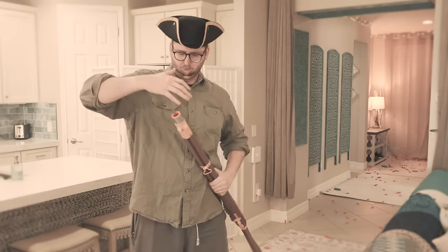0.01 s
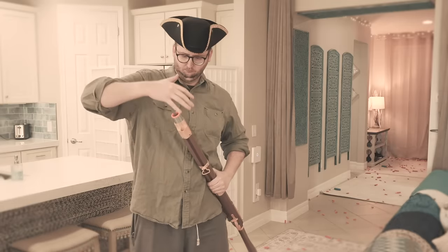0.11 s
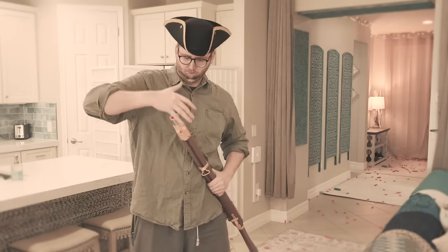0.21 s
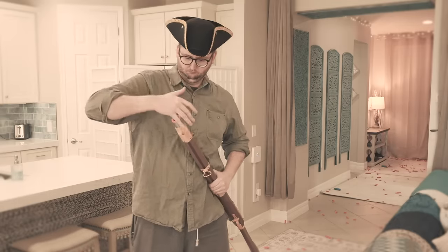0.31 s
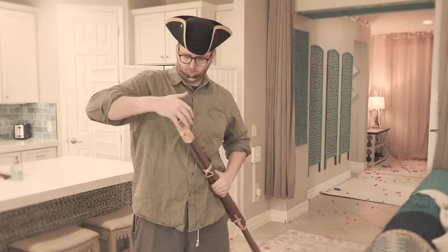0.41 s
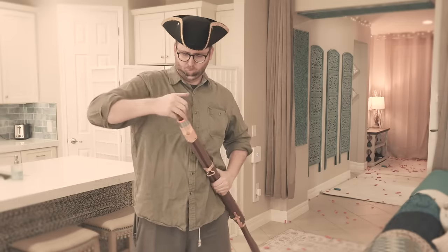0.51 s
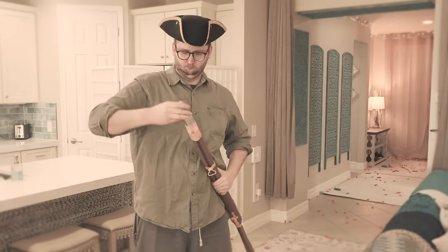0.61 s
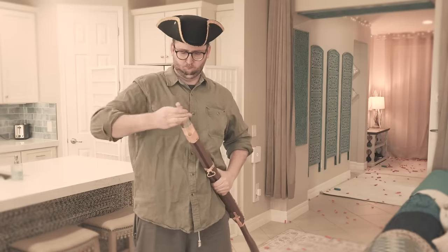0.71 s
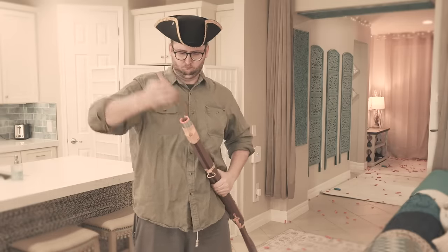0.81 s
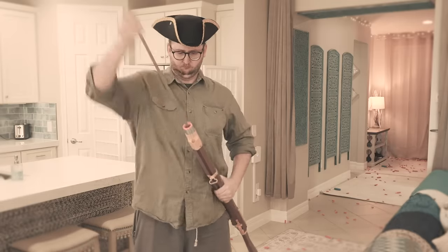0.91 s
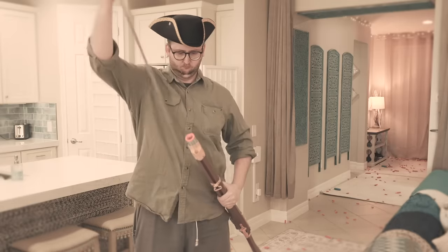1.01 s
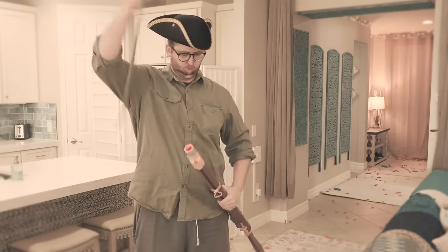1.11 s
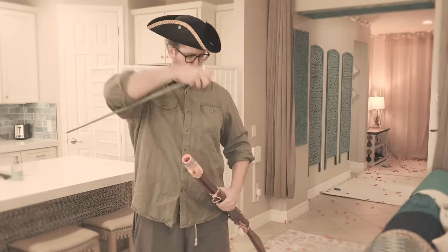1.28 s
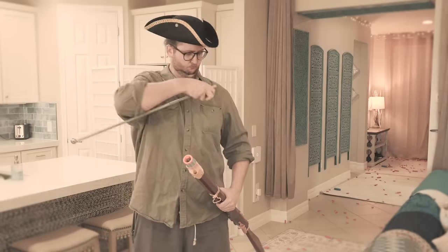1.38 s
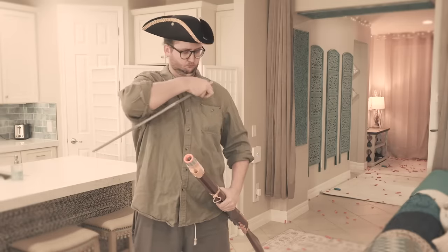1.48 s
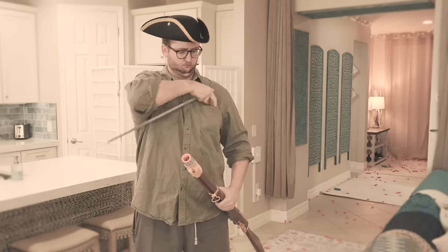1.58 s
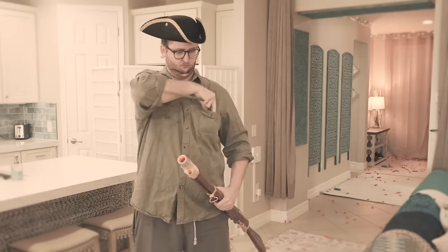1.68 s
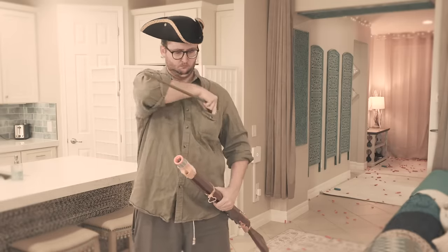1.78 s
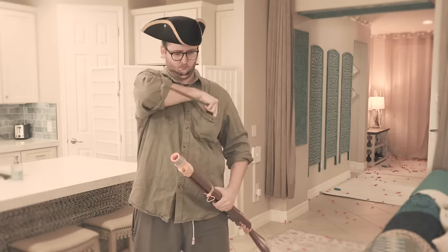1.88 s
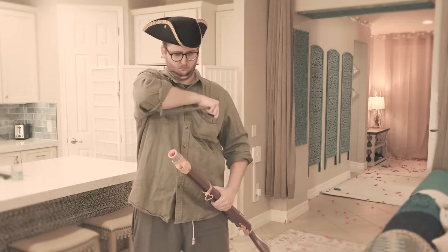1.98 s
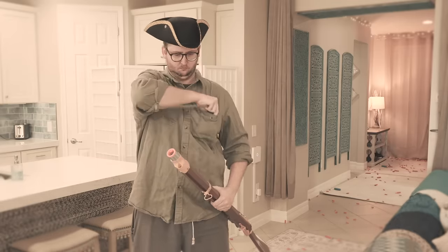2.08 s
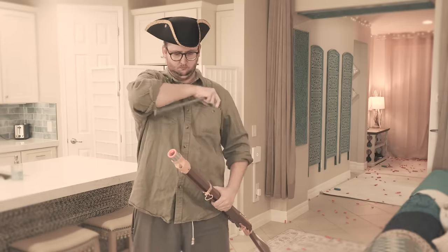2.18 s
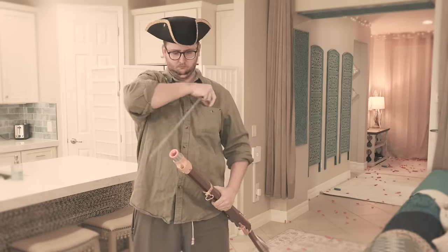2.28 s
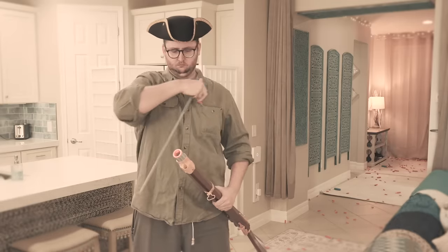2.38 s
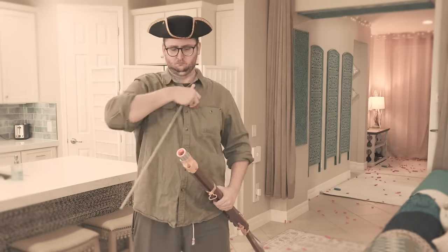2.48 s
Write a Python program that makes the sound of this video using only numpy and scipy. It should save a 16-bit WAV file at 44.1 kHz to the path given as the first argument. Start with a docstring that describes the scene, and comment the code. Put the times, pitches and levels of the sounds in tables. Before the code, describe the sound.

A thin rod scrapes out of a hollow plastic toy musket barrel. Light scuffing begins around 0.1 s, a rough scrape at 0.24 and the loudest sharp clack at 0.32. Softer hollow knocks and scuffs follow from 0.48 to 0.75, then scraping at 0.86 and a bright, briefly ringing triple click at 0.98. Afterwards, faint sleeve swishes around 1.7-2.2 s over quiet appliance hum and hiss, with short room reverberation.

```python
"""In a kitchen, a thin rod is drawn out of a hollow plastic barrel, then a sleeve rustles.
The rod drags and scuffs as streams of random impulses and knocks as single ones; these forces excite
the resonances of air column, shell and rim, and the last blows at the muzzle also ring the freed rod.
The sleeve is coloured noise swelling in swishes, with tiny ticks. Barrel and sleeve sound in a small
room, over wavering appliance hum (sines), a faint far drone (narrow-band noise) and room hiss."""
import sys
import numpy as np
from scipy import signal
from scipy.fft import rfft, irfft, next_fast_len
from scipy.io import wavfile
from scipy.ndimage import map_coordinates

SR = 44100
rng = np.random.default_rng(int(sys.argv[2]) if len(sys.argv) > 2 else 0)


def inscribe(sig):
    """Save sig as 16-bit PCM at rate SR to the path in sys.argv[1].

    A 1-D sig is mono; a 2-D sig holds one channel per row.
    Samples are clipped to [-1, 1] before scaling.
    """
    pcm = np.round(np.clip(np.atleast_2d(sig).T, -1, 1) * 32767)
    wavfile.write(sys.argv[1], SR, pcm.astype(np.int16))


def field_ratio(decibels):
    """Amplitude ratio for a level in dB (20 dB per decade); scalars and array-likes work."""
    return 10 ** (np.asarray(decibels, dtype=float) / 20)


N = 110250  # samples, 2.5 s


def unit(x):
    """Normalisation: scales a signal to rms 1."""
    return x / np.sqrt(np.mean(x ** 2) + 1e-20)


def along(points, hz):
    """Logarithmic frequency axis: interpolates (f/Hz, value) points on it."""
    f, value = np.transpose(points)
    return np.interp(np.log(hz + 1), np.log(f + 1), value)


def curves(rows):
    """Piecewise-linear envelopes: one value per sample for each column after t/s."""
    s, *columns = np.transpose(rows)
    t = np.arange(N) / SR
    return [np.interp(t, s, column) for column in columns]


def wobble(rate):
    """Slow random modulation: a smooth curve through random knots, rate of them a second."""
    return map_coordinates(rng.standard_normal(N // 64), [np.arange(N) * rate / SR])


def filtered(x, response):
    """Linear filtering: multiplies the spectrum of x by a response of frequency."""
    size = next_fast_len(N + SR // 2)
    hz = np.fft.rfftfreq(size, 1 / SR)
    return irfft(rfft(x, size) * response(hz), size)[..., :N]


def resonances(modes, sum_up=True):
    """Modal superposition: second-order peaks of alternating sign, summed or one row each."""
    centre, width, db = np.transpose(modes)[..., None]
    sign = (-1.) ** np.arange(len(modes))[:, None]
    corner = 1.6 * centre[-1]  # Hz; the whole set fades steeply above it

    def peaks(f):
        damping = 1j * f * width
        peak = damping / (centre * centre - f * f + damping)
        return sign * field_ratio(db) * peak / (1 + 1j * f / corner) ** 2

    def summed(f):
        return peaks(f).sum(0)

    return summed if sum_up else peaks


def grains(per_s, spread_db):
    """Shot noise: random impulses of uneven size, rms 1."""
    chance = rng.random(N)
    size = np.minimum(rng.exponential(size=N), 3)
    weight = rng.standard_normal(N)
    return unit((chance < per_s / SR) * field_ratio(spread_db * size) * weight)


def noise(spectrum):
    """Spectral shaping: white noise given a colour, rms 1."""
    white = rng.standard_normal(N)
    return unit(filtered(white, lambda hz: field_ratio(along(spectrum, hz))))


# Appliance hum lines: f/Hz, wander rate/(knots/s), level offset/dB
HUM_LINES = [(58.8, 1.6, -1), (85.6, 6.5, -7), (120, 9.5, -3)]
# Lowest hum line, before its offset; its mean sets the other lines: t/s, level/dB
HUM_LEVEL = [(0.0, -65), (0.29, -66.5), (0.7, -78), (1.04, -69), (1.62, -65), (2.08, -76.5), (2.5, -74)]
# Faint far drone: t/s, level/dB
DRONE_LEVEL = [(2.14, -110), (2.2, -78), (2.31, -79), (2.35, -90), (2.42, -79), (2.5, -78)]
# Resonance of the drone: f/Hz, width/Hz, relative level/dB
DRONE_BAND = [(350, 35, 0)]
# Colour of the room hiss: f/Hz, relative spectral level/dB
HISS_SPECTRUM = [(20, -4.5), (117, -5), (141, -8.5), (175, -13.5), (496, -18), (599, -15.5), (826, -22),
                 (3500, -31.5), (12000, -42), (15600, -74), (22000, -120)]
HISS_DB = -72.5  # rms, before a slow wobble


def background():
    """Stationary sources: phase-wandering hum lines, narrow-band drone noise and broadband hiss."""
    t = np.arange(N) / SR
    low_db, = curves(HUM_LEVEL)
    middle_db = low_db.mean() + 2.5 * wobble(HUM_LINES[1][1])
    high_db = low_db.mean() + 1.5 * wobble(HUM_LINES[2][1])
    hum = np.zeros(N)
    for (hz, rate, offset_db), level_db in zip(HUM_LINES, [low_db, middle_db, high_db]):
        phase = 2 * np.pi * hz * t + 0.7 * wobble(rate)
        hum += field_ratio(level_db + offset_db) * np.sqrt(2) * np.sin(phase)  # level is rms
    band = resonances(DRONE_BAND)
    drone = unit(filtered(rng.standard_normal(N), lambda hz: band(hz) ** 2))
    drone = field_ratio(curves(DRONE_LEVEL)[0]) * drone
    hiss = field_ratio(HISS_DB + 0.67 * wobble(2.4)) * noise(HISS_SPECTRUM)
    return hum + drone + hiss


# Rod dragging on the wall: t/s, shell level/dB, air column over shell/dB, rim over shell/dB
DRAG = [(0, -75, 11, -24), (.1, -84, 13.5, -22), (.17, -62, 4, -18.5), (.19, -53.5, 6, -20.5),
        (.235, -50, 8, -19.5), (.26, -44, -1.5, -17.5), (.31, -45.5, -0.5, -15), (.36, -57, 0, -13),
        (.45, -72, 7, -17), (.54, -72, 7.5, -38), (.635, -70.5, 12, -31), (.67, -70.5, 8, -39),
        (.77, -77.5, 9, -27), (.81, -65, 4.5, -18), (.85, -54.5, 1.5, -11), (.875, -62, 2.5, -18.5),
        (.92, -62.5, 6.5, -13.5), (.962, -54.5, 2.5, -21.5)]
# Short rough bursts: t/s, shell level/dB, air column over shell/dB, rim over shell/dB, decay time/ms
SCUFFS = [(0.0831, -56, 2.5, -24.5, 2.8), (0.1294, -51.5, -7, -29, 8.9), (0.2382, -28, -10, -11, 9.4),
          (0.332, -30.5, -10.5, -16, 5.7), (0.4844, -50.5, 5, -25, 8.4), (0.499, -51.5, 4.5, -19, 2.9),
          (0.5514, -57, -1.5, -6, 3.2), (0.572, -42.5, 0.5, -10.5, 6), (0.589, -41.5, 7.5, -17, 5.9),
          (0.606, -51.5, 9, -27, 3.2), (0.616, -51, 11, -22, 4.7), (0.6817, -51.5, 7, -17, 5.9),
          (0.712, -53.5, -0.5, -21, 8.6), (0.723, -48, 7, -28, 6.1), (0.747, -56, 5.5, -17, 2.9),
          (0.8602, -45.5, -1, -13, 1.4), (0.878, -42, -7, -13, 5.4), (0.89, -38, -3.5, -6, 7.3),
          (0.9635, -35, -0.5, -12, 6.6), (0.981, -26, -6, -1, 8.8), (1, -30, -9.5, -11, 4.8)]
DRAG_END_S = 1
DRAG_GRAINS_PER_S, DRAG_SPREAD_DB, CHATTER_PER_S = 4000, 2.5, 3700
SCUFF_RISE_S = 0.0018


def friction():
    """Rough contact as shot noise: steady drag and scuff bursts; force rows for air, shell, rim."""
    t = np.arange(N) / SR
    bursts = np.zeros((3, N))
    for s, scuff_db, tube_db, rim_db, decay_ms in SCUFFS:
        age = np.clip(t - s, 0, None)
        size = field_ratio(scuff_db + np.array([[tube_db], [0], [rim_db]]))
        bursts += size * (1 - np.exp(-age / SCUFF_RISE_S)) * np.exp(-age * 1000 / decay_ms)
    db, tube_db, rim_db = curves(DRAG)
    balance_db = np.array([tube_db, 0 * db, rim_db])
    press = field_ratio(db + balance_db + 2.2 * wobble(70)) * (t < DRAG_END_S)
    force = []
    for burst, pressure in zip(bursts, press):
        chatter = burst * grains(CHATTER_PER_S, spread_db=0.0)
        drag = pressure * field_ratio(1.9 * wobble(50)) * grains(DRAG_GRAINS_PER_S, DRAG_SPREAD_DB)
        force.append(chatter + drag)
    return np.array(force)


# Rod snapping against the wall: t/s of first touch, shell level/dB, air column over shell/dB, # rim over
# shell/dB; the row at 0.3188 s is a strong echo of the loud blow just before it from a near wall
SNAPS = [(0.1717, -39.5, -8.5, 1), (0.315, -10.5, -19, -6.5), (0.3188, -17, -17.5, -19.5),
         (0.5696, -35.5, -2.5, -8.5), (0.5884, -40, 0, -3.5), (0.7984, -58, -14, 2.5),
         (.8790, -36, -15, -7), (0.9766, -20.5, -17, 2.5), (0.9789, -22, -16, 11),
         (0.9812, -19.5, -9.5, -4)]
LEAD_S, LEAD_DB = .0012, -13.5  # a faint first touch before each blow


def snaps():
    """Impact as an impulse: single blows; one force row each for air column, shell and rim."""
    force = np.zeros((3, N))
    for s, db, tube_db, rim_db in SNAPS:
        size = field_ratio(db + np.array([tube_db, 0, rim_db]))
        force[:, round(s * SR)] += field_ratio(LEAD_DB) * size
        force[:, round((s + LEAD_S) * SR)] += size
    return force


# The barrel's resonances, as air column, plastic shell and hard rim: f/Hz, width/Hz, level/dB
AIR_COLUMN = [(221, 150, -16.5), (334, 390, -12), (566.2, 190, -8.5), (830, 240, -6.5), (1064, 260, 0.5),
              (1660, 880, -4.5)]
SHELL = [(2080, 260, -2), (2538, 470, 1.5), (3220, 840, 1.5), (3744, 540, 2), (5020, 490, 2),
         (5860, 100, -6.5)]
RIM = [(6350, 2100, -2), (8980, 730, 4.5), (9900, 3100, -1), (12000, 470, -7), (12500, 2800, -11.5)]
# Force on the two lowest air resonances: t/s, level/dB
LOW_BODY = [(.17, 7.5), (.3, 0.5), (.7, 0.5), (.9, 3.5), (.97, -4)]
# Ring of the freed rod: f/Hz, width/Hz, level/dB
ROD = [(400, 70, 17), (2927, 90, 21), (3390, 65, 22.5), (5746, 92, 29)]
SWAY_DB, SWAY_PER_S = 2.5, 25  # the moving contact point favours now one resonance, now another
FREE_S = 0.97  # the rod reaches the muzzle


def barrel():
    """Forced modal vibration: blows and friction ring the barrel; at the muzzle the rod rings too."""
    out = np.zeros(N)
    impulse = np.arange(N) == 0
    blows = snaps()
    for modes, blow, rub in zip((AIR_COLUMN, SHELL, RIM), blows, friction()):
        ring = filtered(impulse, resonances(modes))
        sway_db = SWAY_DB * np.array([wobble(SWAY_PER_S) for _ in modes])
        # blows are scaled by the ring's peak, friction by its energy
        force = blow / np.abs(ring).max() + rub * field_ratio(sway_db) / np.linalg.norm(ring)
        if modes is AIR_COLUMN:
            force[:2] *= field_ratio(curves(LOW_BODY)[0])
        out += filtered(force, resonances(modes, sum_up=False)).sum(0)
    muzzle_blows = blows[1] * (np.arange(N) > FREE_S * SR)
    return out + filtered(muzzle_blows, resonances(ROD))


# Colour of the cloth: f/Hz, relative spectral level/dB
CLOTH_SPECTRUM = [(410, -36.5), (700, -7.5), (1360, -2.5), (1900, -10.5), (3400, -4.5), (4300, -9.5),
                  (5360, -4), (6680, -15.5), (13600, -15.5), (15500, -24.5)]
# Tiny ticks: t/s, level/dB before colouring
CLOTH_TICKS = [(1.467, -66), (1.569, -67.5), (1.652, -65), (1.666, -65.5), (2.012, -73), (2.167, -63)]
# Swishes, Gaussian in time: t/s of the middle, level/dB, half length/s (standard deviation)
SWISHES = [(1.483, -91, 0.031), (1.761, -76.5, 0.026), (1.862, -78, 0.023), (1.995, -77, 0.034),
           (2.161, -79.5, 0.014), (2.217, -87, 0.029)]
RUSTLE_DB = -89.5  # the cloth never rests quite


def sleeve():
    """Friction noise: cloth swishes on cloth as the arm turns, with a few tiny ticks."""
    t = np.arange(N) / SR
    swell = np.full(N, field_ratio(RUSTLE_DB))
    for s, db, half in SWISHES:
        swell += field_ratio(db) * np.exp(-((t - s) / half) ** 2 / 2)
    rub = unit(rng.standard_normal(N) + 0.7 * grains(1500, spread_db=3))
    force = rub * swell * field_ratio(1.55 * wobble(29.96))
    decay = np.exp(-np.arange(60) / 20)  # in samples
    for s, tick_db in CLOTH_TICKS:
        force[round(s * SR):][:60] += field_ratio(tick_db) * rng.standard_normal(60) * decay

    def colour(hz):
        return field_ratio(along(CLOTH_SPECTRUM, hz))

    return filtered(force, colour) / np.linalg.norm(filtered(np.arange(N) == 0, colour))


# Reverberation of the room: f/Hz, decay time by 60 dB/s
ROOM_DECAY = [(200, 0.91), (530, 0.37), (3700, 0.35), (9700, .25)]
# First reflections from near walls: delay/s, level/dB
WALLS = [(.0095, -23), (.019, -18)]
ROOM_DB, ROOM_RISE_S = -8, 0.0062  # energy and build-up time of the tail
MOVES_PER_S = 12  # the room answers differently as the source shifts


def room(x):
    """Reverberation by convolution: wall echoes and a decaying noise tail, new for each position."""
    hop = SR // MOVES_PER_S
    out = np.zeros(N + 2 * SR)
    starts = np.arange(-hop, N, hop)
    white = rng.standard_normal((len(starts), SR // 2))
    hz, t, spectrum = signal.stft(white, SR, nperseg=256)
    decay = field_ratio(-60 * t / along(ROOM_DECAY, hz)[:, None])
    tails = signal.istft(spectrum * decay, SR, nperseg=256)[1]
    age = np.arange(tails.shape[1]) / SR
    tails = tails * (1 - np.exp(-(age / ROOM_RISE_S) ** 2))
    tails = field_ratio(ROOM_DB) * tails / np.linalg.norm(tails, axis=1, keepdims=True)
    for s, db in WALLS:
        tails[:, round(s * SR)] += field_ratio(db)
    padded = np.pad(x, (hop, 2 * hop))
    fade = np.sin(np.pi * np.arange(2 * hop) / (2 * hop))  # overlapping fades keep the power constant
    for start, tail in zip(starts + hop, tails):
        answer = signal.fftconvolve(padded[start:start + 2 * hop] * fade, tail)
        out[start:start + len(answer)] += answer
    return out[hop:hop + N]


def scene():
    """Superposition: barrel and sleeve, direct and reverberant, over the background."""
    near = barrel() + sleeve()
    return (near + room(near) + background())[None]


def band_limit(x):
    """A steep low-pass at the top of the band."""
    return signal.sosfilt(signal.butter(12, 16450, fs=SR, output="sos"), x)


def record(dry):
    """Band limitation: the microphone's steep low-pass at 15.7 kHz."""
    mix = filtered(dry, lambda hz: 1 / (1 + (hz / 15700) ** 40))
    return band_limit(mix)


dry = scene()
out = record(dry)
inscribe(out)
```